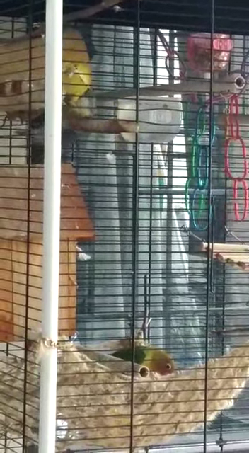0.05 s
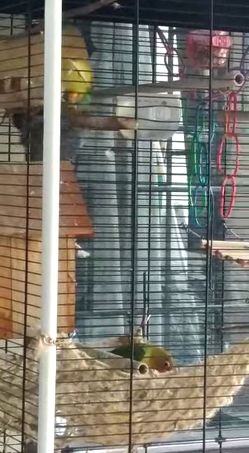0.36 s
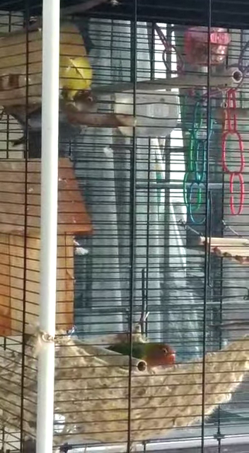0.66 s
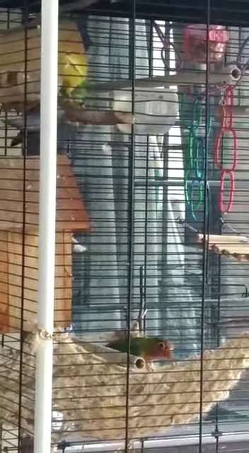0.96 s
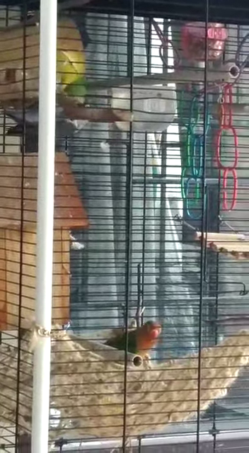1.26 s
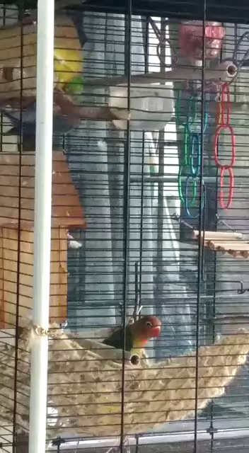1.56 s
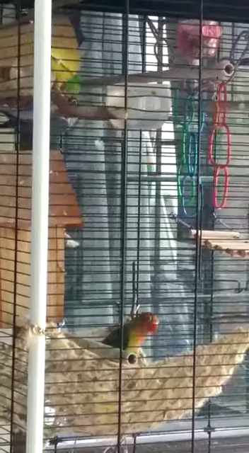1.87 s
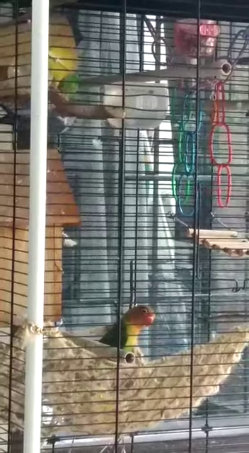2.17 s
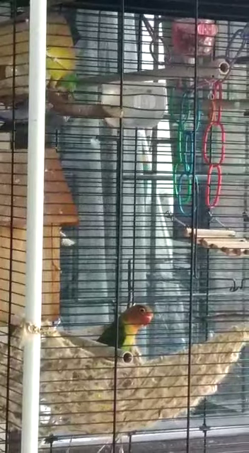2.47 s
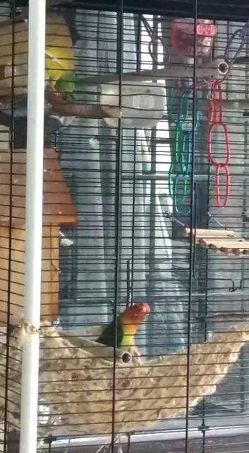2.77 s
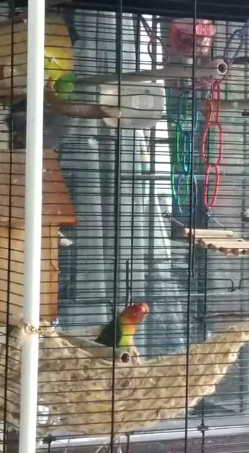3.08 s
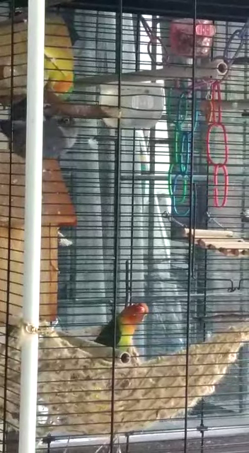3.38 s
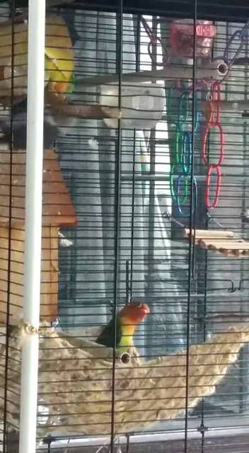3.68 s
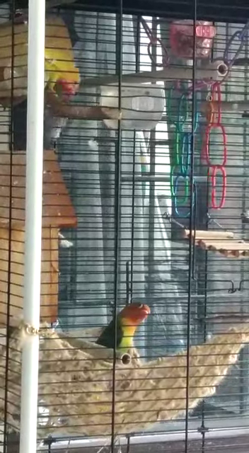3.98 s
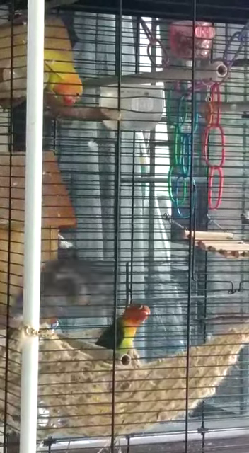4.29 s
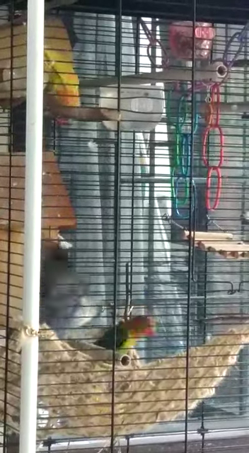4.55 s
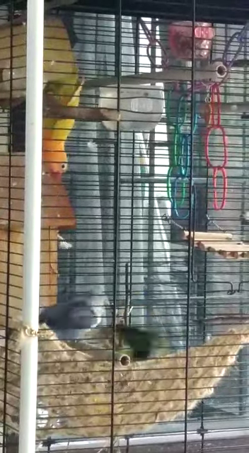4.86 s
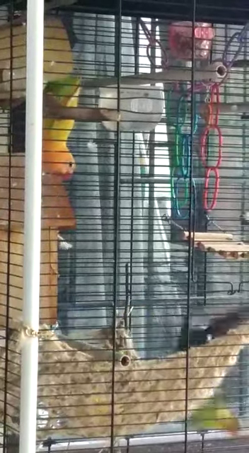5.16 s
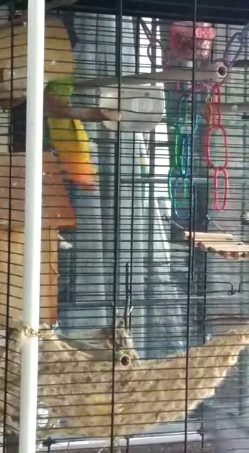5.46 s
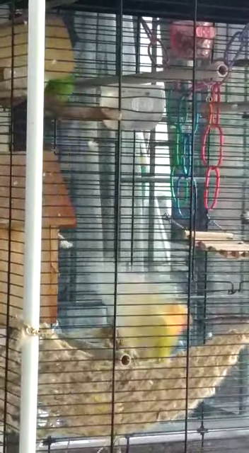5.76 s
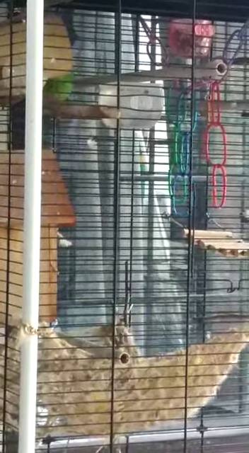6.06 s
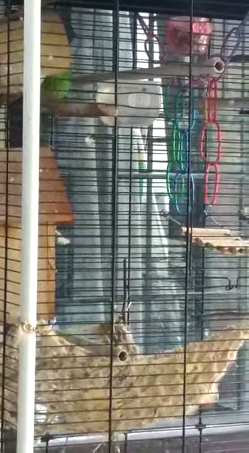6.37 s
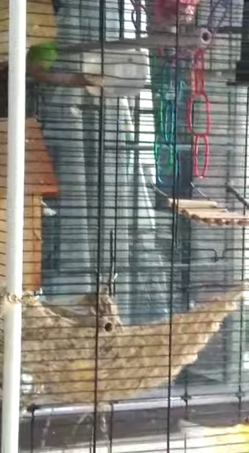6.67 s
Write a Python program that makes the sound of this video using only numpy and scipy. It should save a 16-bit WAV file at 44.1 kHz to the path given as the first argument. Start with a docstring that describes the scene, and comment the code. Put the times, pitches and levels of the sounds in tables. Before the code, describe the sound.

A lovebird calls close by, slightly to the right, in a wire cage in a small, fairly live room. Quick, shrill chirps start at about 0.4 seconds and run into a brief rough screech at 0.6. More chirps and peeps follow from 0.9 to 1.7 seconds, then three rasping churrs between 1.8 and 2.7, and four spaced chirps from 2.8 to 3.9. Around 4 seconds a more distant bird answers with two faint falling whistles. The near bird ends on five sharp, high peeps from 4.2 to 4.7, its loudest calls, along with claw ticks on the wire and a soft flutter. Wings whirr in airy puffs from 5.4 to 5.9, with a few light claps. Claws tick again at 6.1, and a faint falling whistle and a short flutter come near 6.6 to 6.8. A low room rumble and faint hum continue throughout.

```python
"""Quick, arched chirps from a lovebird close by, in a wire cage in a small, fairly live room.
Its syrinx buzzes with a harmonic tone that trembles and roughens when pressed: it strings together chirps,
a screech and rasping churrs, and ends on five sharp peeps. Another bird answers with faint falling whistles.
Wings whirr in puffs of air and claws set the wire ticking, over a low room rumble and a faint hum."""
import sys
import numpy as np
from scipy import signal
from scipy.fft import rfft, irfft, next_fast_len
from scipy.io import wavfile
from scipy.ndimage import uniform_filter1d

SR = 44100
rng = np.random.default_rng(int(sys.argv[2]) if len(sys.argv) > 2 else 0)


def output_pcm(signal):
    """Save a mono or channel-first signal as 16-bit PCM at the path in sys.argv[1].

    Samples are clipped to [-1, 1] before scaling.
    """
    pcm = np.clip(np.atleast_2d(signal).T, -1, 1) * 32767
    wavfile.write(sys.argv[1], SR, np.round(pcm).astype(np.int16))


N = 305613

# Cue levels are pre-fader. "Fundamental" is its gain against the overtones; "treble" is the beak's top shelf.
# Arched chirps: (time [s], length [s], climax [share of length], start [Hz], climax [Hz], end [Hz],
# climax level [dB], swell before [dB], fade after [dB], roughness [0-1], fundamental [dB], treble [dB])
CHIRPS = [ (0.367, 0.035, 0.74, 2598, 3970, 3030, -25.5, 18.5, 6.5, 0.6, 3.5, -7.5),
          (0.405, .033, 0.54, 2870, 4143, 3640, -26, -3, 9, 0.71, -0.5, -8),
          (.495, .08, 0.64, 2535, 2872, 2940, -20.5, 11, 10, 0.34, 4, -2),
          (1.233, 0.094, 0.75, 2578, 2926, 3225, -28, 8, 5.5, 0.62, -1, 2.5),
          (1.406, 0.044, 0.44, 2517, 3522, 3192, -27, 6.5, -0.5, 0.53, 0.5, 1),
          (1.449, .08, 0.078, 3110, 3110, 2460, -27, -0.5, 12, 0.38, -4, -7),
          (1.564, 0.14, .5, 2730, 2800, 2568, -18.5, 11, 17.5, 0.24, -5.5, -3),
          (2.839, .104, 0.59, 2594, 2742, 2488, -24, 23, 12.5, 0.33, -3.5, -3),
          (3.022, .094, .75, 2497, 2877, 2880, -26.5, 10.5, 7.5, 0.31, 0, -3.5),
          (3.48, .094, 0.44, 2438, 2736, 2594, -19.5, 14.5, 12, 0.14, 0, 0),
          (3.831, 0.063, 0.36, 2400, 2555, 2409, -30.5, 2.5, 5, 0.19, 10, -8)]
# Rasping churrs: (time [s], length [s], start [Hz], low point [Hz], end [Hz],
# opening level [dB], sag level [dB], rasp level [dB], fundamental [dB], treble [dB])
CHURRS = [ (1.842, 0.14, 2887, 2533, 2777, -28.5, -27, -25, 1, -1.5),
          (2.173, 0.14, 2902, 2508, 2747, -30, -31.5, -25, 1, -7),
          (2.534, .131, 2585, 2483, 2852, -25.5, -31, -25.5, -0.5, 1)]
# Cracking peeps: (time [s], lead-in length [s], start [Hz], end [Hz], level [dB], roughness [0-1],
# main note length [s], start [Hz], end [Hz], level [dB], roughness [0-1], treble [dB])
PEEPS = [ (.892, .018, 2900, 2296, -21, .42, 0.049, 2997, 3440, -24.5, .7, 3.5),
         (1.175, 0.014, 2200, 2198, -25, 0.2, .029, 3167, 2490, -24, 0.6, -1),
         (4.238, 0.003, 5890, 5790, -19.5, 0.6, 0.017, 6046, 5570, -15, 0.35, -6.5),
         (4.332, 0.0085, 2900, 3104, -21, 0.6, .02, 5920, 6560, -14.5, 0.1, 0.5),
         (4.411, 0.02, 2830, 4280, -22, 0.8, .016, 6050, 5330, -15.5, .15, 4),
         (4.509, 0.012, 3160, 3026, -23, 0.7, 0.026, 4990, 4900, -14.5, 0.6, 2.5),
         (4.633, 0.019, 4130, 2927, -21, 0.53, 0.026, 4924, 5860, -16, .44, 0.5)]
# Breakpoints of one long screech: (time [s], pitch [Hz], level [dB], roughness [0-1], fundamental [dB])
SCREECH = [(.578, 4720, -21, 0.69, -3.5), (.604, 4296, -22.5, .72, -4), (0.611, 3087, -23.5, 0.68, -18),
           (0.631, 2864, -23, 0.72, -16), (.655, 1792, -28.5, 0.9, 13), (0.681, 2095, -25.5, 0.47, 11),
           (.695, 2936, -18, 0.9, 2), (.71, 2407, -21.5, 1.01, 2.5), (0.768, 2959, -22, 0.86, -4.5),
           (.79, 2933, -25, 0.9, 2)]
# Resonances of the throat: (frequency [Hz], gain [dB])
THROAT_EQ = [(1200, -38.5), (1900, -23.5), (2500, -8), (3300, 3), (4000, 0.5), (4600, 7.5), (5450, 10),
             (6200, 11), (7100, 4.5), (8400, 2), (9100, -5.5), (9800, -16.5), (11300, -14.5), (13400, -14),
             (14600, -19), (16000, -22.5)]
# The far bird's falling whistles: (time [s], length [s], top [Hz], end [Hz], level [dB], roughness [0-1])
WHISTLES = [(3.92, 0.09, 4830, 3960, -55, 0.1), (4.044, 0.11, 7490, 4450, -48, 0.51),
            (6.578, .125, 7200, 3850, -56, 0.6)]
# Bursts of wing strokes: (time [s], length [s], stroke spacing [s], mid-flight level [dB], swell [dB])
FLIGHTS = [(4.302, 0.12, 0.046, -50.5, 1), (5.39, .23, .042, -52, 7), (5.732, 0.17, .046, -45, -0.5),
           (6.695, 0.075, 0.038, -51.5, 0.5)]
# A wing claps against the body or the cage: (time [s], level [dB])
WING_CLAPS = [(5.372, -48), (5.71, -43), (5.731, -38.5), (5.824, -33.5)]
# Tone of air through feathers: (frequency [Hz], gain [dB])
FEATHER_EQ = [(71, -56), (120, -15.5), (286, -2), (569, -8.5), (754, -4.5), (961, -14.5), (1830, -13),
              (2640, -20), (8180, -16), (9810, -31.5), (15000, -32.5)]
# Claws striking the wire: (time [s], level [dB])
CLAW_TICKS = [(4.205, -26), (4.237, -11.5), (6.124, -22.5), (6.137, -35)]
# Ringing modes of the cage wire: (frequency [Hz], level [dB], 60 dB decay time [s])
WIRE_MODES = [(3330, -12.5, 0.0153), (5370, -13, 0.011), (6060, -1, .01), (7360, -7.5, 0.019),
              (8200, -8.5, 0.03), (9120, -17, 0.019), (13210, -18, 0.02)]
# Shading of the near bird on the left side: (frequency [Hz], gain [dB])
LEFT_EQ = [(1500, 1.5), (2800, 1), (4200, -2), (5800, -4.5), (7200, -9), (8500, -8.5), (9800, 2.5),
           (11000, 4.5), (12800, 0), (15500, -1.5)]
# Length of the room's tail: (frequency [Hz], 60 dB decay time [s])
ROOM_DECAY = [(300, 0.83), (2800, 0.47), (5500, 0.46), (9000, 0.37), (14000, 0.37)]
# Tone of the room's reflections: (frequency [Hz], gain [dB])
ROOM_EQ = [(300, -10.5), (2800, 0.5), (5500, -1), (9000, 1.5), (14000, 1)]
# Room tone, a deep rumble with a thin hiss on top: (frequency [Hz], gain [dB])
RUMBLE_EQ = [(15, -54.5), (25, -31.5), (53, -2), (108, -7), (200, -3), (229, -9.5), (263, -6.5), (714, -21),
             (840, -19.5), (1890, -24.5), (2550, -24.5), (3920, -28), (5140, -30.5), (6740, -31),
             (16000, -44)]
# How alike the two sides are in diffuse sound: (frequency [Hz], left-right correlation [0-1])
STEREO_LIKENESS = [(60, 0.91), (150, 0.82), (300, 0.91), (600, 0.35), (1500, 0.093), (12000, 0)]


def near_bird(screech_treble_db=(5, -5)):
    """The lead voice: each call has its own opening of the beak, which narrows through the screech."""
    out = np.zeros(N)
    for call, cues in ((chirp, CHIRPS), (churr, CHURRS), (peep, PEEPS)):
        for s, *shape, treble_db in cues:
            add(out, s, beak(call(s, *shape), treble_db))
    screech = syrinx(SCREECH)
    add(out, SCREECH[0][0], beak(screech, np.linspace(*screech_treble_db, len(screech))))
    return out


def chirp(s, length, climax, start_hz, top_hz, end_hz, level_db, swell_db, fade_db, rough, fundamental_db,
          bend=1.8, mellow_db=6.5, pressed_db=-1.5):
    """Effort builds to a climax and relaxes, bending pitch and level; slack ends sound mellower."""
    share = np.linspace(0, 1, 25)
    slack = np.interp(share, [0, climax, 1], [-1, 0, 1])   # zero at the climax
    edge_hz = np.where(slack < 0, start_hz, end_hz)
    pitch = top_hz + (edge_hz - top_hz) * np.abs(np.sin(np.pi / 2 * slack)) ** bend
    loudness_db = level_db - np.where(slack < 0, swell_db, fade_db) * slack ** 2
    body_db = fundamental_db + pressed_db + mellow_db * slack ** 2
    roughness = np.full_like(share, rough)
    return syrinx(np.column_stack([s + length * share, pitch, loudness_db, roughness, body_db]))


def churr(s, length, start_hz, low_hz, end_hz, opening_db, sag_db, rasp_db, fundamental_db,
          settle=0.11, sag=0.42, crest=0.77, fade_db=-5.0, thin_db=-7.5, harsh=0.71, clear=0.15, rasp=0.73):
    """Two pushes in one call: a harsh opening, a slack clear middle, a rising rasp."""
    return syrinx([
        (s, start_hz, opening_db, harsh, fundamental_db),
        (s + settle * length, (start_hz + 3 * low_hz) / 4, opening_db, (harsh + clear) / 2, fundamental_db),
        (s + sag * length, low_hz, sag_db, clear, fundamental_db + thin_db),
        (s + crest * length, (low_hz + 2 * end_hz) / 3, rasp_db, rasp, fundamental_db),
        (s + length, end_hz, rasp_db + fade_db, rasp, fundamental_db)])


def peep(s, lead, lead_start_hz, lead_end_hz, lead_db, lead_rough, length, start_hz, end_hz, level_db, rough,
         crack_s=0.0006, onset_db=-7.0, fade_db=-5.5, lead_fundamental_db=1.5):
    """A rough lead-in swells until the voice cracks into its upper register."""
    jump = s + lead + crack_s
    fundamental_db = 5.5 - 10.5 * rough   # rough notes lose body
    return syrinx([(s, lead_start_hz, lead_db + onset_db, lead_rough, lead_fundamental_db),
                   (s + lead, lead_end_hz, lead_db, lead_rough, lead_fundamental_db),
                   (jump, start_hz, level_db, rough, fundamental_db),
                   (jump + length, end_hz, level_db + fade_db, rough, fundamental_db)])


def syrinx(breakpoints, attack_s=0.0014, release_s=0.014, trill_hz=300, trill_spread=0.35, trill_depth=0.095,
           waver_depth=0.017, flick_depth=0.148, doubling=0.97, throb=0.38, sputter=0.2):
    """A harmonic buzz that trembles when pressed, then breaks into a screech; rows are as in SCREECH."""
    times, *lanes = np.transpose(breakpoints)
    t = np.arange(times[0], times[-1] + release_s, 1 / SR)
    count = len(t)
    pitch, level_db, rough, fundamental_db = (np.interp(t, times, lane) for lane in lanes)
    rough = np.clip(rough, 0, 1)
    # even clear notes waver; the rasp is a fast, uneven trill; a screech adds wide, slower flicks
    trill_phase = 2 * np.pi * np.cumsum(trill_hz * (1 + trill_spread * wobble(count, 30, 243))) / SR
    waver = waver_depth * wobble(count, 32.6, 260)
    trill = trill_depth * rough * np.sin(trill_phase)
    flicks = flick_depth * rough ** 3 * wobble(count, 44.3, 175.6)
    phase = 2 * np.pi * np.cumsum(pitch * np.exp(waver + trill + flicks)) / SR
    # loud, rough notes are the brightest
    db_per_octave = -3 + 0.21 * np.clip(level_db + 20, -12, 3) + 1.9 * rough
    tone = from_db(fundamental_db) * np.sin(phase)
    for k in range(2, 8):
        octaves = np.log2(k * pitch / 2700)
        tone += from_db(db_per_octave * octaves) * np.sin(k * phase) * (k * pitch < SR * 0.4)
    # at the highest pressure the cycle doubles erratically and the gaps between harmonics fill
    tone *= 1 + doubling * rough ** 4 * np.cos(phase / 2 + 2 * wobble(count, 30, 259))
    voice = equalise(tone, THROAT_EQ)
    voice /= np.sqrt(uniform_filter1d(voice ** 2, size=96) + 1e-9)   # level out the throat's peaks
    # a rough voice also throbs with the trill and sputters in short lumps
    voice *= unit_rms(np.exp(rough * (throb * np.cos(trill_phase) + sputter * wobble(count, 32, 160))))
    fade_in = np.clip((t - times[0]) / attack_s, 0, 1)
    fade_out = np.clip((t[-1] - t) / release_s, 0, 1) ** 2
    return voice * fade_in * fade_out * from_db(level_db)


def beak(voice, treble_db, shelf_hz=10100):
    """A wide-open beak lets more of the top treble out."""
    top = signal.sosfiltfilt(signal.butter(4, shelf_hz, "high", fs=SR, output="sos"), voice)
    return voice + top * (from_db(treble_db) - 1)


def far_bird(climax=0.22, scoop=0.77):
    """The answer: whistles with a strong fundamental that scoop up, peak early and slide down."""
    out = np.zeros(N)
    for s, length, top_hz, end_hz, level_db, rough in WHISTLES:
        add(out, s, chirp(s, length, climax, scoop * top_hz, top_hz, end_hz, level_db,
                          swell_db=7.0, fade_db=8.0, rough=rough, fundamental_db=10.5, bend=1.2))
    return out


def wings(rise_s=0.0028, clap_rise_s=0.001013):
    """Evenly spaced soft strokes whirr through each flight; a few sharper claps cut through."""
    out = np.zeros(N)
    for s, length, spacing, level_db, swell_db in FLIGHTS:
        for after in np.arange(0, length, spacing):
            stroke_db = level_db - swell_db * (2 * after / length - 1) ** 2
            add(out, s + after - rise_s, wing_stroke(stroke_db, rise_s, fall_s=0.011))
    for s, level_db in WING_CLAPS:
        add(out, s - clap_rise_s, wing_stroke(level_db, clap_rise_s, fall_s=0.0044))
    return out


def wing_stroke(level_db, rise_s, fall_s, makeup_db=4.5):
    """A puff of air with a rustle of feathers."""
    t = np.arange(SR // 8) / SR
    puff = (1 - np.exp(-t / rise_s)) * np.exp(-t / fall_s)
    rustle = np.exp(0.35 * wobble(len(t), 100, 900))
    air = unit_rms(equalise(rng.standard_normal(len(t)), FEATHER_EQ))
    return from_db(level_db + makeup_db) * puff * rustle * air


def claws(gain_db=-20.0, scatter_db=2.9):
    """A claw sets the cage wire ringing briefly, damped by the foot."""
    out, t = np.zeros(N), np.arange(SR // 8) / SR
    for s, level_db in CLAW_TICKS:
        ring = sum(from_db(db + rng.normal(0, scatter_db) - 60 * t / t60) * np.sin(2 * np.pi * hz * t)
                   for hz, db, t60 in WIRE_MODES)
        add(out, s, from_db(level_db + gain_db) * ring)
    return out


def room(x, tail_db, early_db, early_t60=0.027, predelay_s=0.003, echoes_per_s=1500):
    """Close surfaces give a quick cluster of echoes; the walls add a tail that dies sooner in the treble."""
    count = SR * 3 // 4
    t, hz = np.arange(count) / SR, np.fft.rfftfreq(count, 1 / SR)
    spectrum, tail = rfft(diffuse_noise(count)), 0
    edges_hz = [0, 1000, 2000, 4000, 7000, 10000, SR / 2]
    for low, high in zip(edges_hz, edges_hz[1:]):
        band = irfft(spectrum * (hz >= low) * (hz < high), count)
        tail = tail + band * from_db(-60 * t / at_hz(ROOM_DECAY, (low + high) / 2))
    echoes = rng.standard_normal((2, count)) * (rng.random((2, count)) < echoes_per_s / SR)
    early = echoes * from_db(-60 * t / early_t60)
    tail, early = (part * (t > predelay_s) for part in (tail, early))
    tail, early = (part / np.linalg.norm(part, axis=1, keepdims=True) for part in (tail, early))
    response = equalise(from_db(tail_db) * tail + from_db(early_db) * early, ROOM_EQ)
    return signal.fftconvolve(x[None], response, axes=1)[:, :N]


def room_tone(rumble_db=-57.5, sway_db=1.14, draught_db=-5.5, hum_hz=103.4, hum_db=-66):
    """The bed: a gently swaying rumble that swells with the draught of each flight; faint hum and hiss."""
    t = np.arange(N) / SR
    sway = np.interp(t, np.linspace(0, t[-1], 40), rng.standard_normal(40))
    draught = sum(from_db(level_db + draught_db) / (1 + ((t - s - length / 2) / length) ** 2)
                  for s, length, _, level_db, _ in FLIGHTS)
    rumble = unit_rms(equalise(diffuse_noise(next_fast_len(N))[:, :N], RUMBLE_EQ))
    hum = from_db(hum_db) * np.sqrt(2) * np.sin(2 * np.pi * hum_hz * t)
    return rumble * np.hypot(from_db(rumble_db + sway_db * sway), draught) + hum


def diffuse_noise(count):
    """White stereo noise, narrow in the bass and wide in the treble."""
    mid, side = rfft(rng.standard_normal((2, count)))
    alike = at_hz(STEREO_LIKENESS, np.fft.rfftfreq(count, 1 / SR))
    return irfft(np.sqrt(1 + alike) * mid + np.sqrt(1 - alike) * side * [[1], [-1]], count)


def wobble(count, low_hz, high_hz):
    """Random modulation within a band of rates, spread about 1."""
    sos = signal.butter(2, [low_hz, high_hz], "band", fs=SR, output="sos")
    return unit_rms(signal.sosfilt(sos, rng.standard_normal(SR // 2)))[-count:]


def equalise(x, curve):
    """Apply an EQ curve of (frequency [Hz], gain [dB])."""
    count = x.shape[-1]
    size = next_fast_len(count + 512)
    gain = from_db(at_hz(curve, np.fft.rfftfreq(size, 1 / SR)))
    return irfft(rfft(x, size) * gain, size)[..., :count]


def at_hz(curve, hz):
    """Read a curve on a log-frequency axis."""
    points_hz, values = np.transpose(curve)
    return np.interp(np.log(np.maximum(hz, 1)), np.log(points_hz), values)


def from_db(db):
    """Decibels to gain."""
    return 10 ** (np.asarray(db) / 20)


def unit_rms(x):
    """Scale to unit power."""
    return x / np.sqrt(np.mean(x ** 2) + 1e-20)


def add(out, s, sound):
    """Mix a sound in at s seconds."""
    at = round(s * SR)
    out[at:at + len(sound)] += sound[:len(out) - at]


def scene(left_lead_s=0.000045):
    """The mix: the near bird up front, shaded on the left; the far bird arrives mostly by the walls."""
    near, far = near_bird(), far_bird()
    bustle = wings() + claws()
    direct = np.array([np.roll(near, -round(left_lead_s * SR)), near]) * from_db([[-3.0], [3.5]])
    left, right = direct + room(near, tail_db=-2.0, early_db=-0.5) * from_db([[1.0], [0.0]])
    lead = np.array([equalise(left, LEFT_EQ), right])
    answer = from_db(-13.0) * far + room(far, tail_db=0.5, early_db=1.5)
    cage = from_db(-3.5) * bustle + room(bustle, tail_db=1.5, early_db=-1.5)
    return lead + answer + cage * from_db([[-0.6], [0.6]]) + room_tone()


def record(dry, cutoff_hz=15900):
    """A steep high cut on the master."""
    return signal.sosfiltfilt(signal.ellip(10, 0.05, 60, cutoff_hz, fs=SR, output="sos"), dry)


dry = scene()
out = record(dry)
output_pcm(out)
```